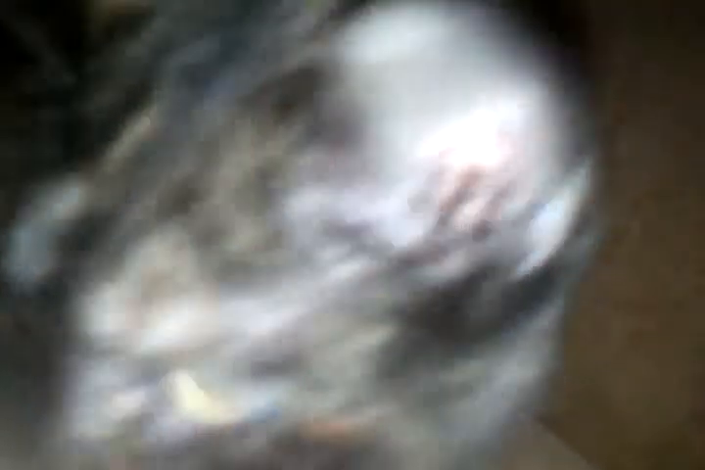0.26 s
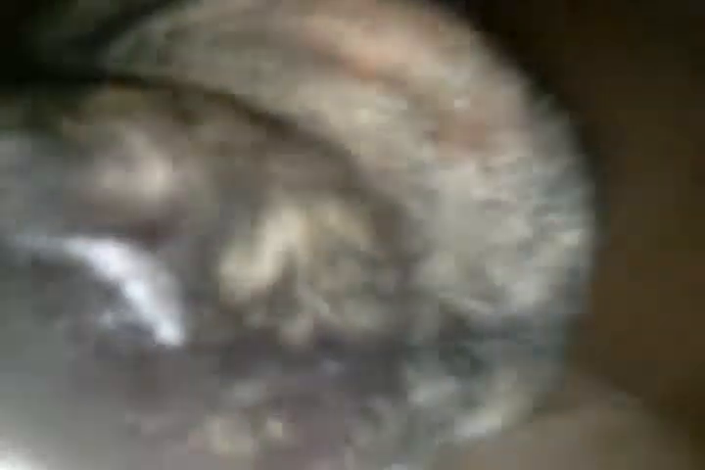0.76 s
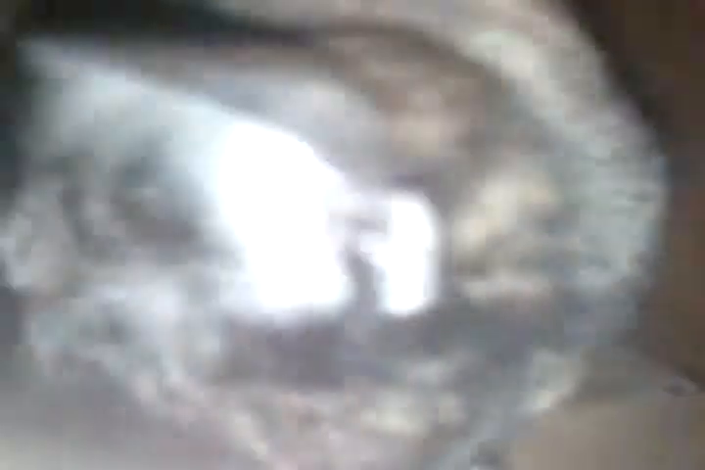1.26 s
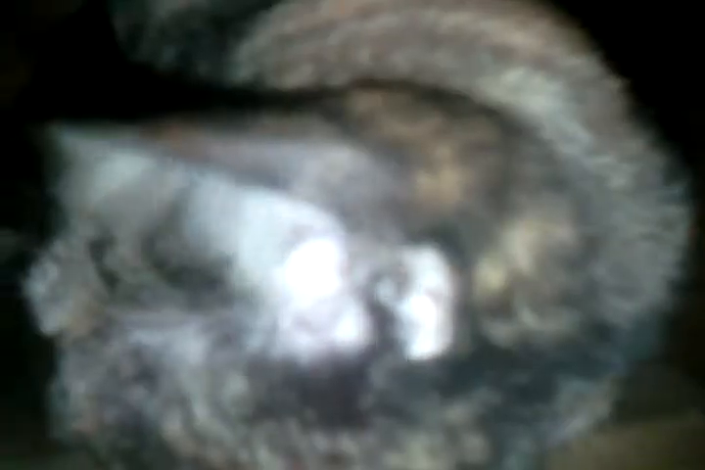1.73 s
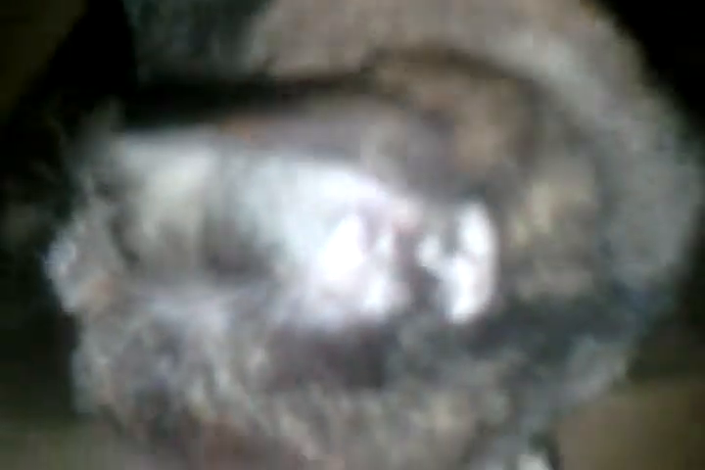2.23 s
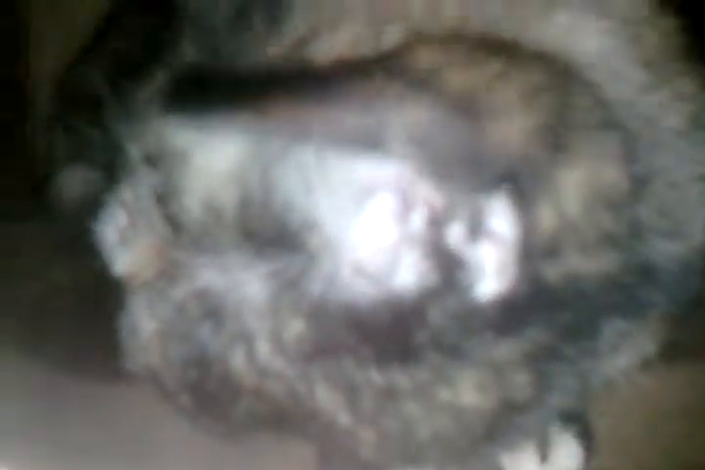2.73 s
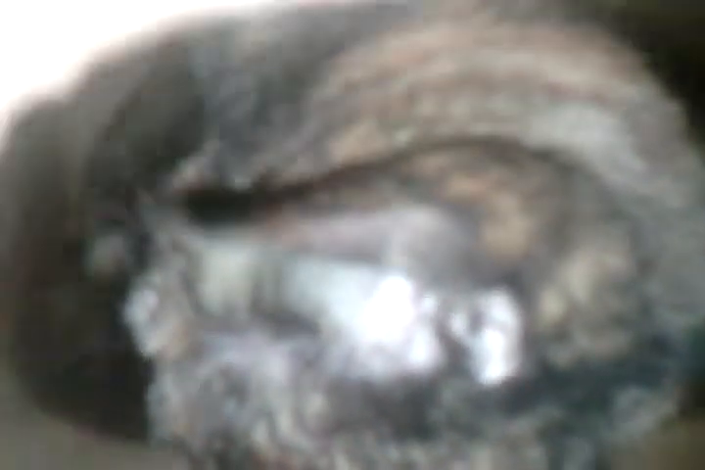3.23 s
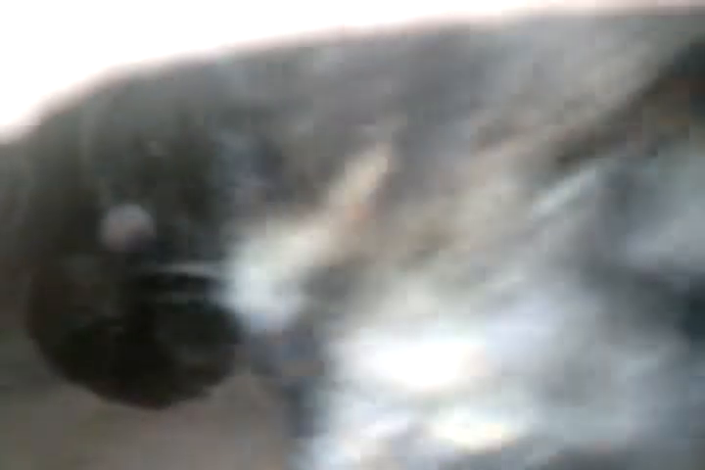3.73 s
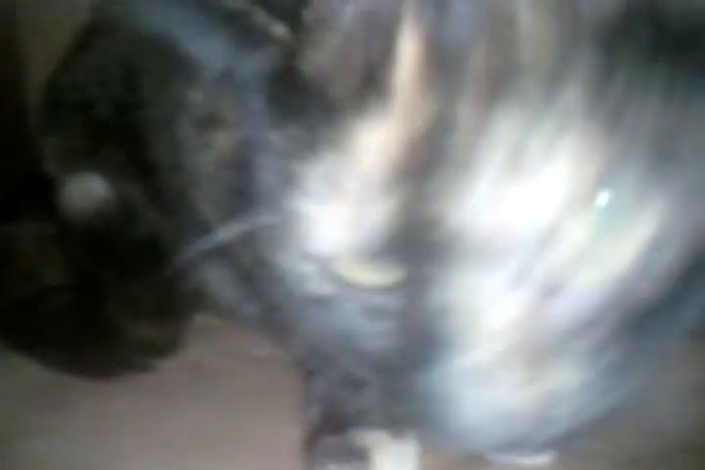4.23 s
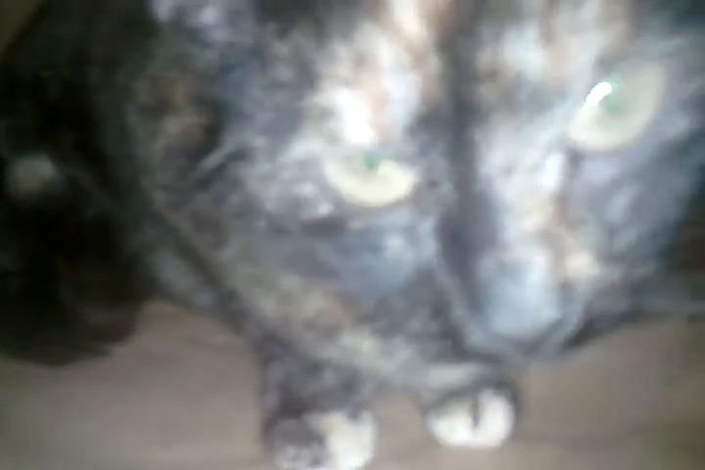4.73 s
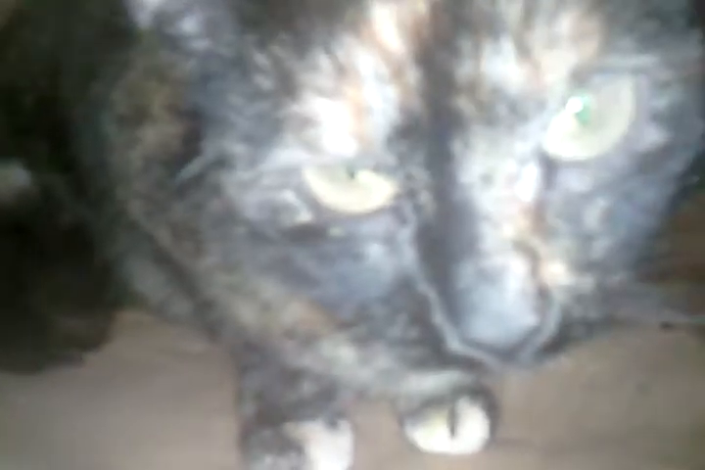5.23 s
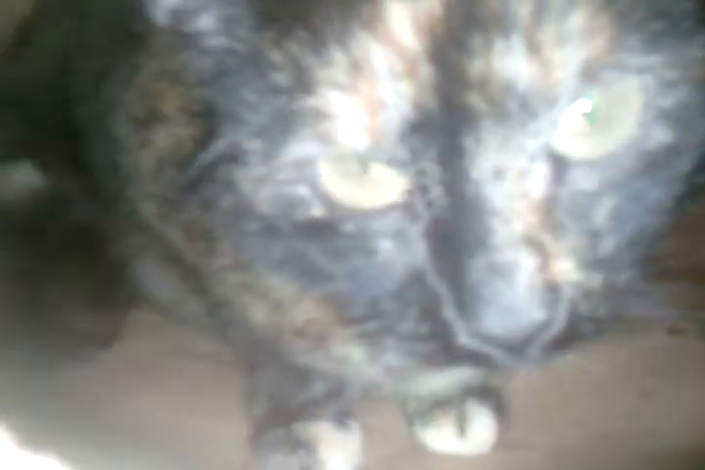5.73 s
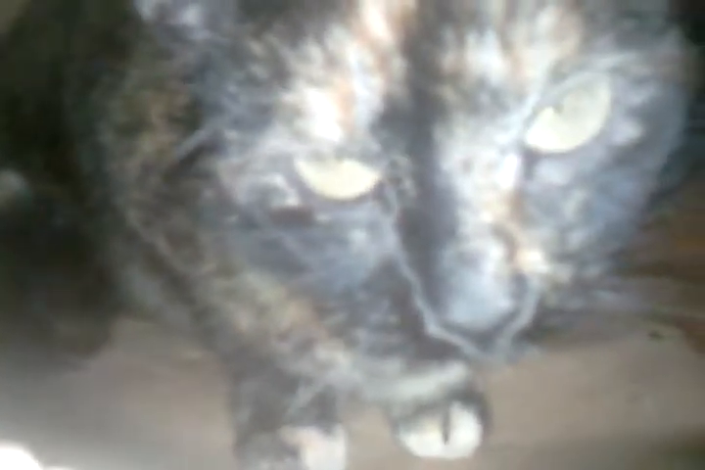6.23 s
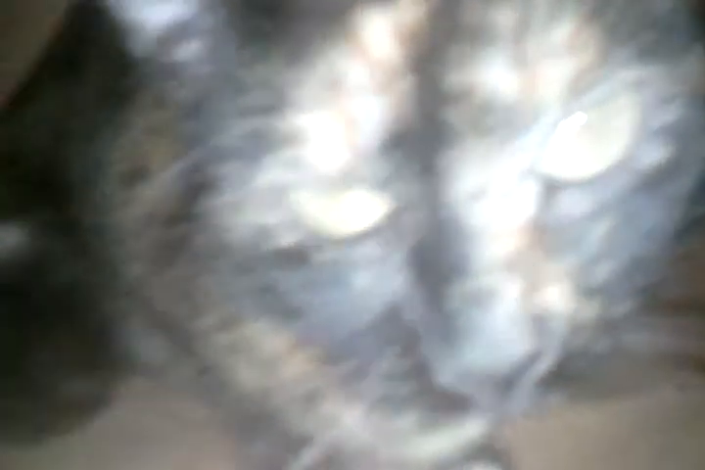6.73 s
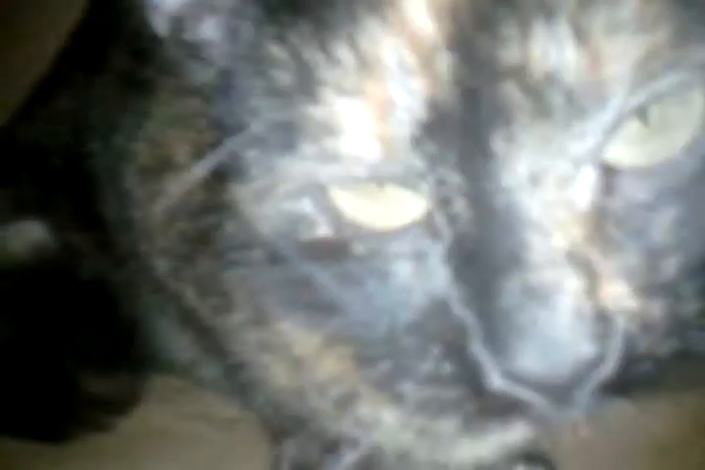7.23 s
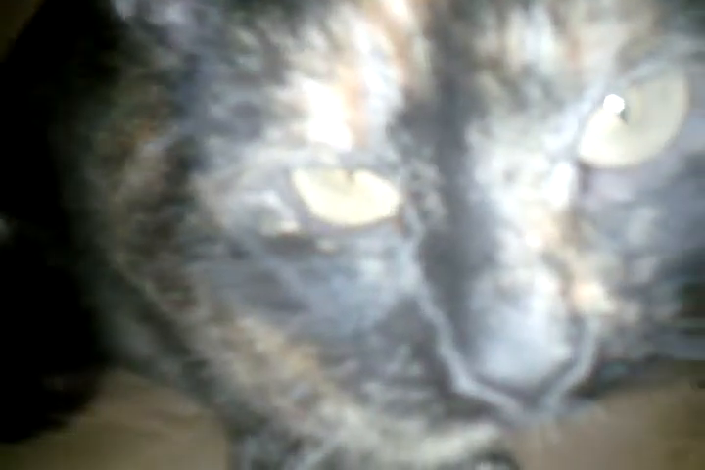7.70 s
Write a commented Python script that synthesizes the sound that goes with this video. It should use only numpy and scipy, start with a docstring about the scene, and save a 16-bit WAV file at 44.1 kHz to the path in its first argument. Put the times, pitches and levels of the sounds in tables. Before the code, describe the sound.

Low muffled cat growl under sharp, overloaded knocks on hollow wood and dry scrapes; the growl stops and sparse handling taps remain over soft hiss.

```python
"""A cat growls low and close by, then falls silent: uneven glottal pulses excite the throat's resonances.
Fingers tap a hollow wooden board in two places: short force pulses ring its modes and a microphone cavity.
They also rub over the board and over fur: stick-slip grains excite broad resonances.
The microphone hisses, with a faint steady tone, and overloads on the hardest taps."""
import sys
import numpy as np
from scipy import signal
from scipy.fft import rfft, irfft
from scipy.io import wavfile

SR = 44100
rng = np.random.default_rng(int(sys.argv[2]) if len(sys.argv) > 2 else 0)


def linear_from_db(decibels):
    """Turn decibels (scalar or array-like) into linear amplitude factors; 0 gives 1."""
    return 10 ** (np.asarray(decibels, float) / 20)


def dump(signal):
    """Clip the signal to [-1, 1] and save it as 16-bit WAV at the path in sys.argv[1]."""
    limited = np.clip(np.atleast_2d(signal).T, -1, 1)
    pcm = np.round(limited * 32767).astype(np.int16)
    wavfile.write(sys.argv[1], SR, pcm)


N = 351256

# Finger taps: onset t/s, level/dB, contact time/ms, treble level re the low part/dB
TAPS = [(0.5926, -56.5, 0.27, 17), (.855, -29, 1.5, -16), (1.142, -26.5, 0.42, -5.5),
        (1.546, -11.5, 0.42, -5), (1.7903, -7, .4, -1), (1.9885, -23, 0.3, 2.5), (2.82, -52, 0.26, -15),
        (3.096, -66, 0.094, 21), (3.12, -65, 0.11, 25), (3.298, -8, 0.32, 0.5), (3.4363, -39, 0.197, 3),
        (3.6254, -2.5, 0.37, -13.5), (3.7021, -38.5, 0.34, -7), (3.8617, -11, 0.32, -13),
        (5.353, -19.5, 3.7, -30), (5.3586, -18.5, 3.9, -25), (5.366, -28, 4.4, -25),
        (5.389, -39, 0.27, -12), (5.4638, -42, 0.13, -2), (5.6558, -34, 0.13, 14), (5.6558, -18, 0.25, 6),
        (5.8783, -19.5, 0.079, 2), (6.1047, -39, 0.22, -2), (7.881, -62, .1, 14), (7.1174, -28, 0.42, -24),
        (7.11787, -27, 0.42, -24) ]
EDGE_FROM_S, EDGE_TO_S = 5.3, 6.2  # the hand works at the edge of the board, else in the middle


def evened(x):
    """Normalization: scales a signal to rms 1."""
    return x / np.sqrt(np.mean(x ** 2) + 1e-20)


def add(mix, s, sound):
    """Linear superposition: adds a sound into the mix from second s."""
    part = mix[round(s * SR):][:len(sound)]
    part += sound[:len(part)]


def wander(size, hz):
    """Band-limited random fluctuation: noise low-passed at hz, of rms 1."""
    lowpass = signal.butter(2, hz, fs=SR, output="sos")
    return evened(signal.sosfiltfilt(lowpass, rng.standard_normal(size)))


def resonate(x, hz, width):
    """Forced resonance: a single complex pole of fixed frequency, with peak gain near 1."""
    pole = np.exp((2j * hz - width) * np.pi / SR)
    return 2 * signal.lfilter([1 - abs(pole)], [1, -pole], x).real


def slide(x, hz, width):
    """Moving resonance by heterodyning: shift the curve hz to zero, smooth, shift back."""
    turn = np.exp(2j * np.pi * np.cumsum(hz) / SR)
    r = np.exp(-np.pi * width / SR)
    return 2 * (turn * signal.lfilter([1 - r], [1, -r], x / turn)).real


def hiss():
    """Stationary noise: spectrally shaped microphone hiss and room hush, plus one faint pure tone."""
    # Noise spectrum: f/Hz, relative spectral level/dB
    hiss_spectrum = [(18, -39.5), (30, -7.5), (55, -11), (202, -12.5), (237, -10.5), (467, -13.5),
                     (622, -15), (830, -16.5), (945, -19), (12900, -24.5), (15500, -27)]
    hiss_db, tone_hz, tone_db = -63.5, 1109, -80.5  # hiss rms, tone peak
    f, spectrum_db = np.transpose(hiss_spectrum)
    bins = np.fft.rfftfreq(N, 1 / SR)
    shape_db = np.interp(np.log(bins + 1), np.log(f + 1), spectrum_db)
    noise = irfft(rfft(rng.standard_normal(N)) * linear_from_db(shape_db), N)
    tone = np.sin(2 * np.pi * tone_hz * np.arange(N) / SR)
    return linear_from_db(hiss_db) * evened(noise) + linear_from_db(tone_db) * tone


def room(x):
    """Diffuse reverberation: convolution with noise whose exponential decay depends on frequency."""
    # Reverberation: f/Hz, decay time T60/s
    room_decay = [(150, 0.51), (600, .22), (2500, 0.1), (8000, 0.15)]
    f, t, cells = signal.stft(rng.standard_normal(SR // 3), SR, nperseg=256)
    t60 = np.interp(f, *np.transpose(room_decay))[:, None]
    envelope = linear_from_db(-60 * t / t60) * np.clip(t / 0.002, 0, 1)
    tail = signal.istft(cells * envelope, SR, nperseg=256)[1]
    return signal.oaconvolve(x, tail / np.linalg.norm(tail))[:N]


def board(place):
    """Modal superposition: the board's damped modes after an impulse at place 0 (middle) or 1 (edge)."""
    # Board modes: f/Hz, T60/s, signed amplitude factor, level in the middle/dB, level at the edge/dB
    board_modes = [(125, 0.19, 0.99, -19.5, -8), (178, 0.051, 0.39, 1.5, 3.5), (217.4, 0.1, 0.54, -5, 2.5),
                   (271.2, 0.17, 0.46, -33, -4), (314, 0.081, 0.21, -18, 10), (342, 0.095, 0.23, -4.5, -25),
                   (452, 0.25, 0.35, -19.5, -41), (570.3, 0.054, 0.63, -14.5, -38),
                   (651.7, 0.04, 0.091, -28, 16), (724, 0.032, 0.91, -3.5, -99),
                   (743, 0.016, -0.71, 5.5, -1.5), (921, 0.0074, 0.64, -38, -14.5),
                   (958.6, 0.04, -0.066, 14.5, 19), (1092, 0.022, -1.7, -14, -25),
                   (1133, 0.041, 0.46, -31, 0), (1330, .025, -0.31, -25.5, -19),
                   (1665, 0.024, -0.43, -7.5, 0.5), (1936, 0.004, -1.53, 10, 1.5),
                   (2370, 0.016, -0.92, -4, 7.5), (2698, .008, -2.1, -16, 4), (2820, 0.002, -0.2, -28, 15)]
    t = np.arange(6000) / SR
    return sum(sign * linear_from_db(levels_db[place] - 60 * t / t60) * np.sin(2 * np.pi * f * t)
               for f, t60, sign, *levels_db in board_modes)


def strokes():
    """Stroke kinematics: rows of (s, length s, place of the peak 0-1, landing dB, dB of three ring groups)."""
    # Strokes on wood: t/s, length/s, level near 2 kHz/dB, level near 7 kHz/dB
    wood_strokes = [(1.027, 0.17, -65.5, -73), (1.152, 0.15, -66, -73), (1.318, 0.1, -63, -70),
                    (1.546, 0.012, -49, -54), (1.626, 0.02, -45, -46.5), (1.722, 0.041, -65.5, -67),
                    (1.788, 0.06, -52.5, -56), (1.889, 0.027, -47.5, -49.5), (1.988, 0.09, -53.5, -54),
                    (2.114, 0.065, -52.5, -55), (2.232, 0.075, -62, -65), (2.301, 0.14, -68, -68),
                    (2.572, 0.14, -60.5, -65), (2.78, 0.068, -68, -67), (3.305, 0.11, -56.5, -61.5),
                    (3.42, 0.026, -55, -53), (3.63, 0.038, -71, -65), (3.683, 0.025, -53.5, -61.5),
                    (3.86, 0.1315, -56.5, -61), (3.977, 0.015, -62, -68), (5.35, 0.011, -55.5, -55),
                    (5.364, 0.048, -48, -61), (5.45, 0.02, -51.5, -53), (5.655, 0.092, -56, -63),
                    (5.885, 0.037, -51, -68), (5.937, 0.047, -56.5, -64), (6.105, 0.014, -67, -81),
                    (7.125, 0.024, -73, -79), (7.868, 0.12, -55.5, -61.5)]
    # Strokes over fur: t/s, length/s, level near 7 kHz/dB, level near 12 kHz/dB
    fur_strokes = [(0.845, 0.22, -61, -61), (2.907, 0.091, -67, -58.5), (3.065, 0.36, -70, -74),
                   (3.46, 0.22, -73, -80.5), (4.231, 0.039, -70, -76), (4.361, 0.23, -68, -64.5),
                   (5.379, 0.047, -54.5, -57.5), (6.576, 0.11, -67, -69), (6.864, 0.12, -69.5, -80)]
    wood_top_db, fur_low_db = -15.5, -4.5  # wood near 12 kHz and fur near 2 kHz, re their level near 7 kHz
    drag_gap_s, flick_s = 0.015, 0.033  # longest gap from tap to drag; flicks are shorter than this
    rows = [(s, length, low_db, mid_db, mid_db + wood_top_db) for s, length, low_db, mid_db in wood_strokes]
    rows += [(s, length, mid_db + fur_low_db, mid_db, top_db) for s, length, mid_db, top_db in fur_strokes]
    tap_times = np.array([row[0] for row in TAPS])
    out = []
    for s, length, *levels_db in rows:
        since_tap = s - tap_times
        if np.any((since_tap > 0) & (since_tap < drag_gap_s)):
            peak, landing_db = 0.1, -7  # dragged on from a tap: strongest early
        elif length < flick_s:
            peak, landing_db = 0.72, -21.5  # a flick creeps in and builds towards its end
        else:
            peak, landing_db = 0.45, -7
        out.append((s, length, peak, landing_db, *levels_db))
    return out


def stroke_force(length, peak, landing_db):
    """Friction envelope: the skin lands, presses hardest at peak, lifts, and the force decays exponentially."""
    fade_s = 0.0099  # time constant after the skin lifts
    u = np.linspace(0, 1, round(length * SR))
    shape = evened(linear_from_db(np.interp(u, [0, 0.05, peak, 1], [-27.5, landing_db, -3, -13.5])))
    fade = shape[-1] * np.exp(-np.arange(round(0.06 * SR)) / (fade_s * SR))
    return np.concatenate([shape, fade])


def rubs():
    """Stick-slip friction: dense uneven grains excite three groups of resonances and the board."""
    # Three lists, near 2, 7 and 12 kHz: f/Hz, nominal width/Hz, level in the middle/dB, level at the edge/dB
    ring_groups = [
        [(1220, 380, 12, -14), (1804, 600, 26, -5), (2320, 600, 8.5, 2), (3430, 539, 0, -17)],
        [(5540, 2000, -5, -8.5), (6584, 870, -8, -2), (7160, 1293, -0.5, 2)],
        [(9795, 2500, -5, 3), (12690, 2660, -2, -6.5)],
    ]
    grains = rng.standard_normal(N) * linear_from_db(2.1 * wander(N, 200))
    samples = np.arange(N)
    at_edge = (samples > EDGE_FROM_S * SR) & (samples < EDGE_TO_S * SR)
    out = np.zeros(N)
    for group, modes in enumerate(ring_groups):
        force = np.zeros(N)
        for s, length, peak, landing_db, *levels_db in strokes():
            add(force, s, linear_from_db(levels_db[group]) * stroke_force(length, peak, landing_db))
        rung = np.zeros(N)
        for f, nominal, middle_db, edge_db in modes:
            # two poles in cascade, each broadened, give steeper skirts
            once = resonate(grains, f, 1.9 * nominal)
            rung += linear_from_db(np.where(at_edge, edge_db, middle_db)) * resonate(once, f, 1.9 * nominal)
        out += force * evened(rung)
        if group == 0:  # the lowest group's force also shakes the whole board
            shake = linear_from_db(-25.5) * force * evened(grains)
            for place in range(2):
                out += signal.oaconvolve(shake * (at_edge == place), board(place))[:N]
    return out


def tap(level_db, contact_ms, treble_db, place):
    """Impact excitation: a half-sine force rings the board; the nail's tick rings the microphone cavity."""
    # Cavity in front of the microphone: nominal f/Hz, T60/s, relative level/dB
    cavity_modes = [(4180, 0.025, -28.5), (5300, .005, -19.5), (5660, .006, -5.5), (6500, 0.007, -5),
                    (6330, 0.0035, -16), (7470, 0.0052, -1), (7955, 0.0037, -3), (9300, 0.0054, -13.5),
                    (10900, 0.0094, -17.5), (12420, 0.0033, -18), (14520, .004, -18)]
    bounce_ms, bounce_db = 0.42, -22.5  # the nail touches again, faintly
    t = np.arange(6000) / SR
    touches = np.zeros(400)
    touches[0] = 1
    touches[int(bounce_ms * SR / 1000)] = linear_from_db(bounce_db)
    push = np.sin(np.pi * np.clip(t[:200] * 1000 / max(contact_ms, 0.08), 0, 1))
    push /= push.sum()
    low = np.convolve(push, 0.36 * board(place))[:len(t)]
    low[:200] -= 1.4 * push  # the push itself is heard directly, with opposite sign
    tick = np.zeros(len(t))
    for f, t60, mode_db in cavity_modes:
        detuned = f * rng.uniform(0.94, 1.01)
        tick += linear_from_db(mode_db - 60 * t / t60) * np.sin(2 * np.pi * detuned * t)
    tick *= 1 - np.exp(-t / 0.00024)  # soft onset
    return linear_from_db(level_db) * np.convolve(touches, low - linear_from_db(treble_db) * tick)


def growl():
    """Source-filter phonation: slack folds fire phase-modulated pulses into the throat's resonances."""
    # Course of the growl: t/s, level/dB, nominal vocal pulse rate/Hz, nominal chest swing f/Hz
    growl_course = [(0, -47, 98, 163.3), (0.501, -46.5, 101, 166), (.75, -43.5, 100, 171.7),
                    (1, -47, 89.3, 161), (1.5, -48, 98, 157), (1.8, -49.5, 93, 170),
                    (2.15, -49.5, 112, 174), (2.6, -51.5, 102, 155.1), (2.78, -53, 78, 174.3),
                    (3.05, -50.5, 83, 150.3), (3.25, -50.5, 77, 151.8), (3.451, -52, 95, 170),
                    (3.53, -53.5, 78, 175.5), (3.6, -51, 106, 177.1), (3.75, -55, 82, 175),
                    (3.851, -49.5, 95, 170.2), (3.95, -52.5, 100, 170)]
    # Throat and nose with the mouth shut: mean f/Hz, width/Hz, relative level/dB
    throat_modes = [(123, 26, -16), (178, 60, 4.5), (265.4, 220, -18.5), (302.4, 73, -4.5), (388.4, 31, 2),
                    (461.1, 30, -20), (550, 24, -13.5), (750, 140, -9), (872.4, 150, -9)]
    stop_s, stop_db = 0.035, -39  # the throat shuts
    throat_follows = 0.22  # exponent: how far the resonances slide with the chest swing (0-1)
    s, *columns = np.transpose(growl_course)
    t = np.arange(round((s[-1] + stop_s) * SR)) / SR
    effort_db, rate, swing_hz = (np.interp(t, s, c) for c in columns)
    effort_db = effort_db + stop_db * np.clip((t - s[-1]) / stop_s, 0, 1)

    # the folds roughen (0-1) between these seconds as the air runs low
    rough = np.interp(t, [1.3, 2.1], [0.55, 0.85])
    swing = 2 * np.pi * np.cumsum(swing_hz * (1 + 0.06 * rough * wander(len(t), 25))) / SR
    turns = np.cumsum(rate * (1 + 0.13 * rough * wander(len(t), 8))) / SR
    turns += 0.14 * np.sin(swing)  # the faster swing shifts pulses, so long and short gaps mix
    turns += 0.11 * rough * wander(len(t), 60)  # rough folds fire early or late
    at = np.flatnonzero(np.diff(np.floor(np.maximum.accumulate(turns))))
    pulses = np.zeros(len(t))
    pulses[at] = linear_from_db(4.5 * rough[at] * rng.uniform(-1, 1, len(at)))
    puffs = np.convolve(pulses, signal.windows.gaussian(301, 11.0), "same")  # rounded puffs of air
    drive = evened(puffs - puffs.mean()) + 0.27 * wander(len(t), 600)  # with breath noise

    stretch = (swing_hz / swing_hz.mean()) ** throat_follows
    voice = sum(linear_from_db(mode_db) * slide(drive, f * stretch, bandwidth) for f, bandwidth, mode_db in throat_modes)
    voice = signal.sosfiltfilt(signal.butter(3, 95, "high", fs=SR, output="sos"), voice)
    # shut lips hold back the treble
    muffled = signal.sosfiltfilt(signal.butter(4, 600, fs=SR, output="sos"), voice)
    return linear_from_db(effort_db) * evened(muffled + 0.3 * voice)


def scene():
    """Superposition of hiss, rubs, taps and growl; only the hand's sounds excite the reverberation."""
    hand = rubs()
    for s, *row in TAPS:
        add(hand, s, tap(*row, int(EDGE_FROM_S < s < EDGE_TO_S)))
    # the small capsule drops the deepest bass
    hand = signal.sosfilt(signal.butter(1, 45, "high", fs=SR, output="sos"), hand)
    mix = hand + linear_from_db(-21.0) * room(hand) + hiss()
    add(mix, 0, growl())
    return mix[None]


def roll_off(x):
    """The treble ends steeply here."""
    return signal.sosfilt(signal.butter(12, 15860, fs=SR, output="sos"), x)


def record(dry):
    """Amplitude saturation and band limiting: hard clipping, a linear-phase low-pass and a steady offset."""
    clip_level, edge_hz, offset = 0.71, 14700, 0.0127  # clip and offset re full scale
    clipped = np.clip(dry, -clip_level, clip_level)
    lowpass = signal.firwin(255, edge_hz, window=("kaiser", 9), fs=SR)
    narrow = signal.oaconvolve(clipped, lowpass[None], "same")
    return roll_off(narrow + offset)


dry = scene()
out = record(dry)
dump(out)
```